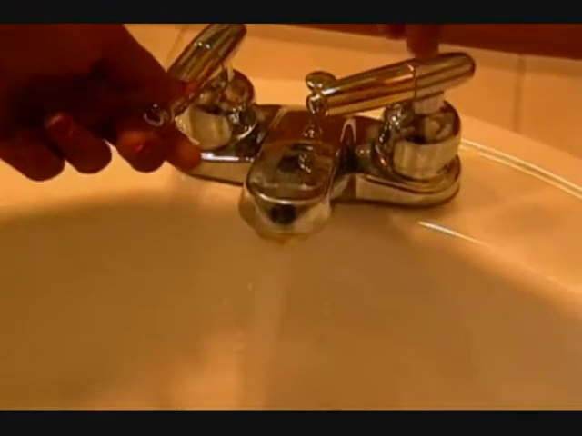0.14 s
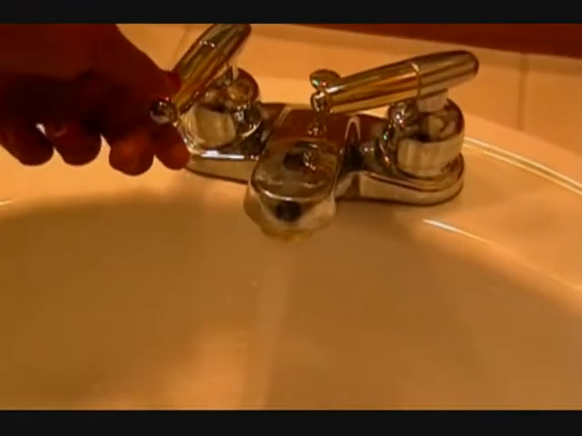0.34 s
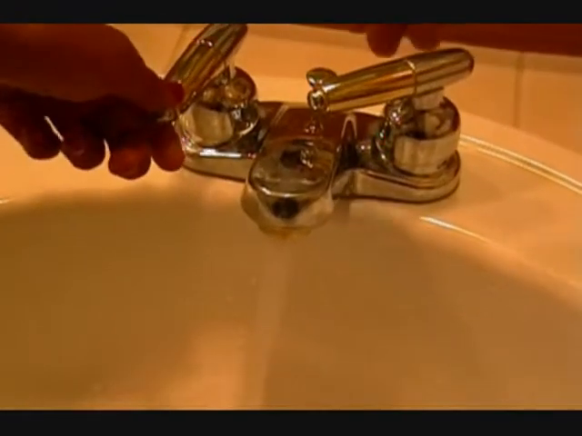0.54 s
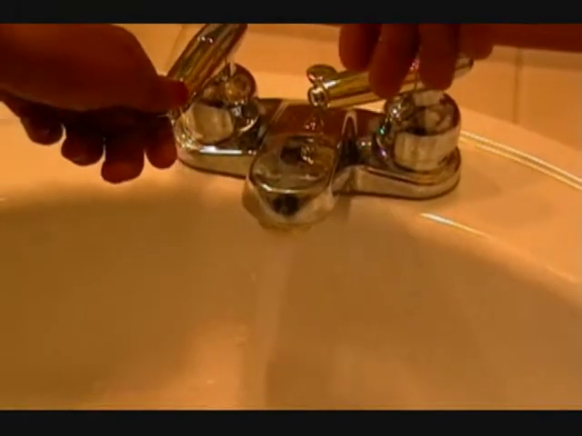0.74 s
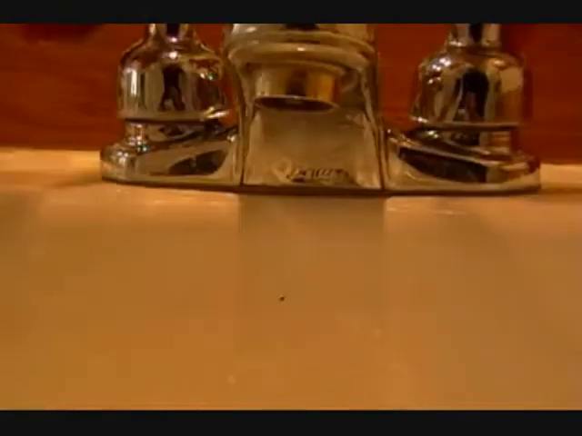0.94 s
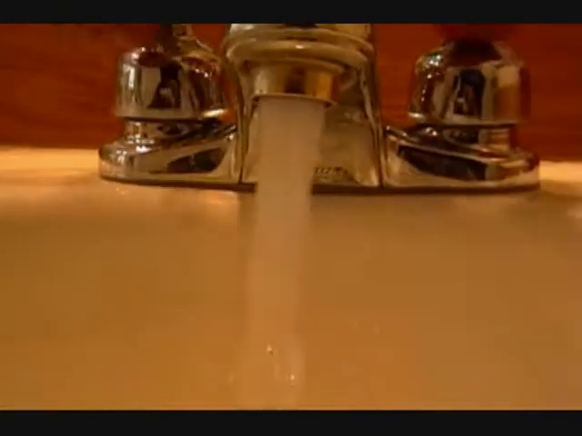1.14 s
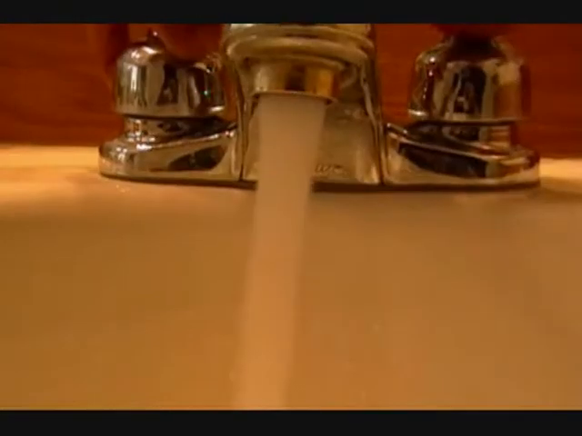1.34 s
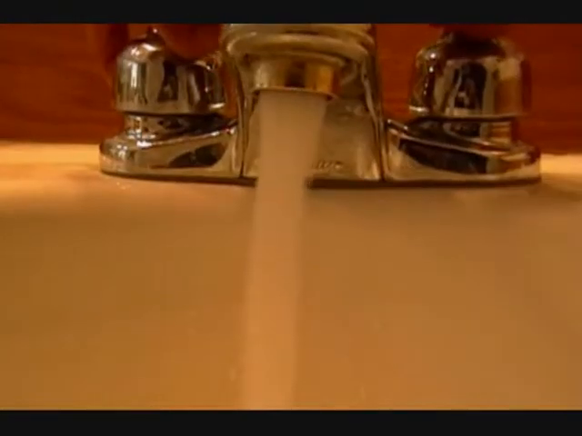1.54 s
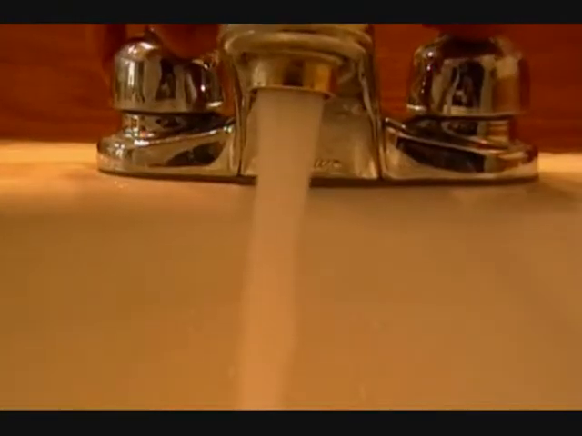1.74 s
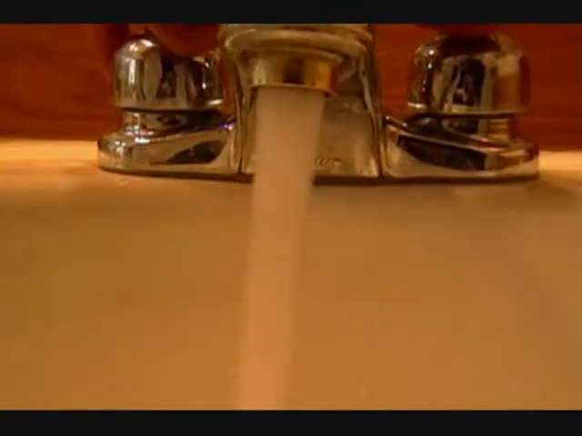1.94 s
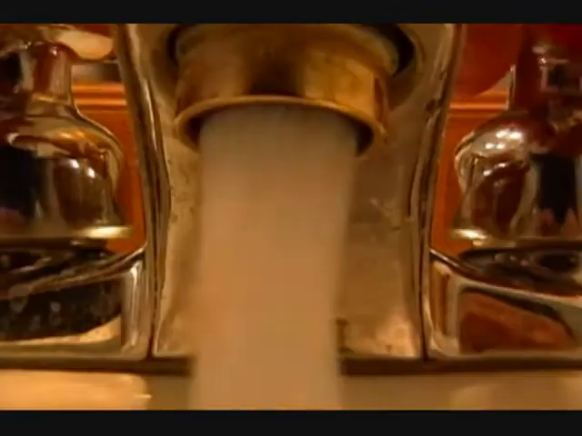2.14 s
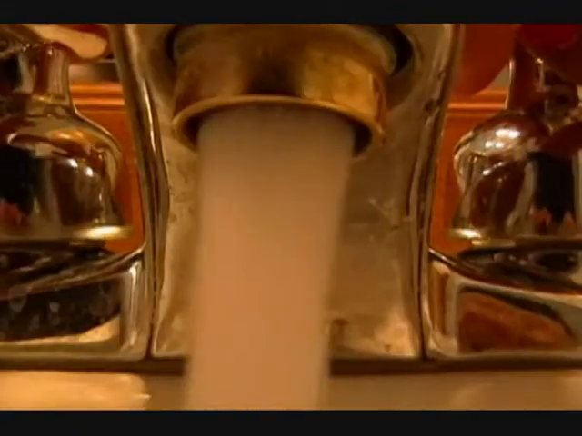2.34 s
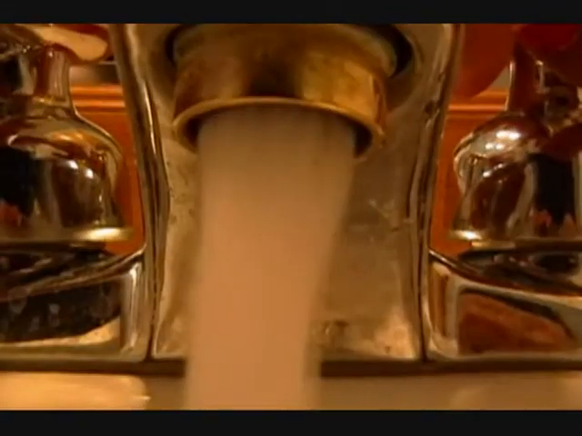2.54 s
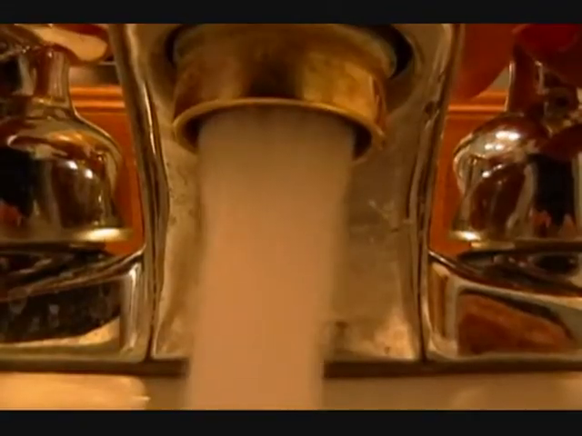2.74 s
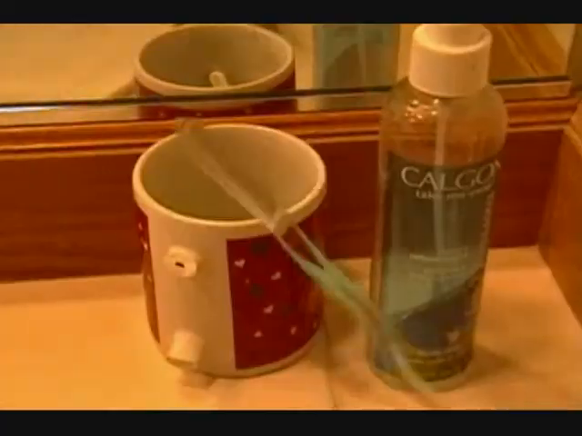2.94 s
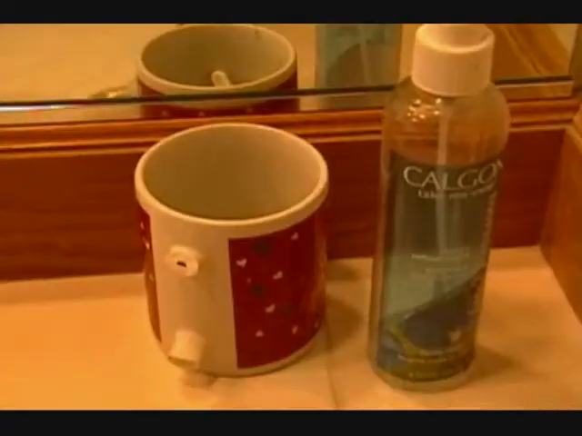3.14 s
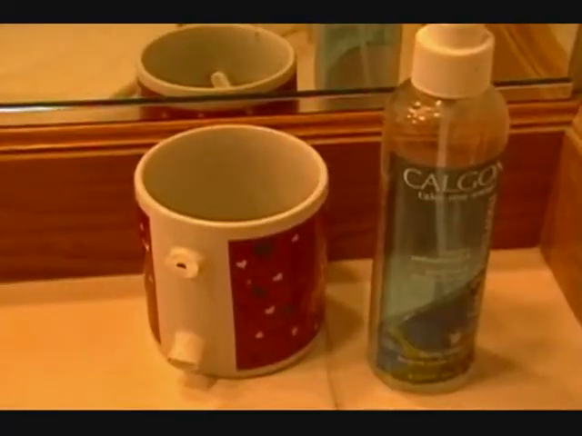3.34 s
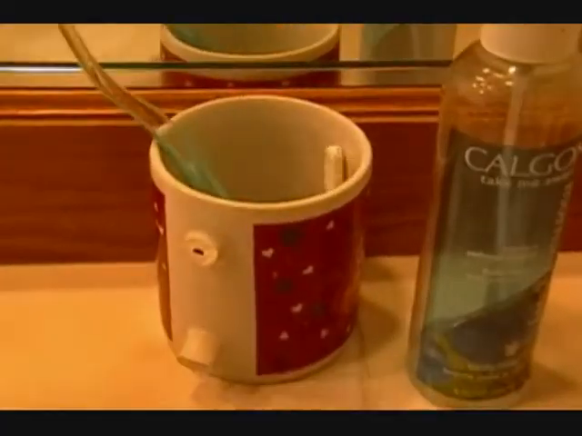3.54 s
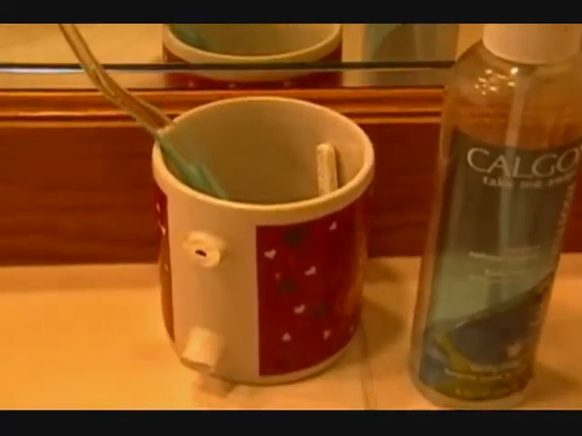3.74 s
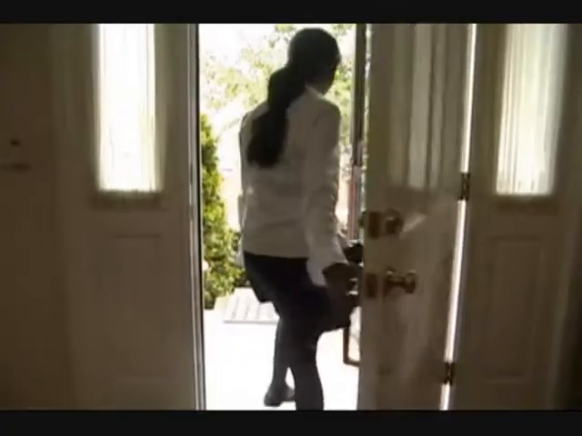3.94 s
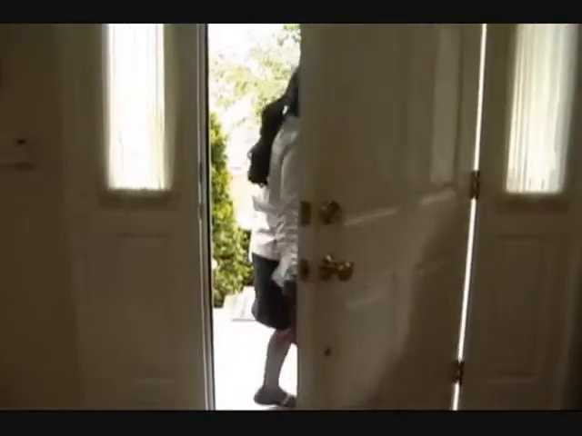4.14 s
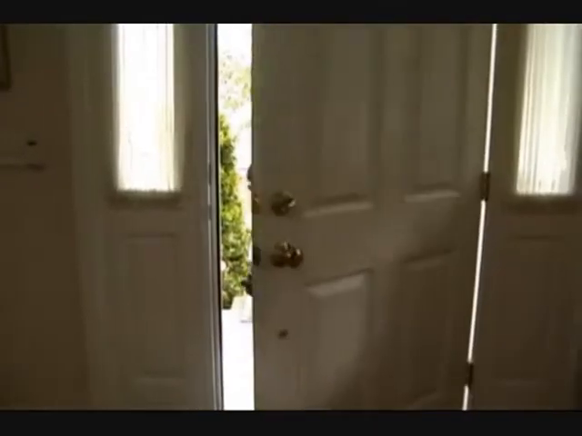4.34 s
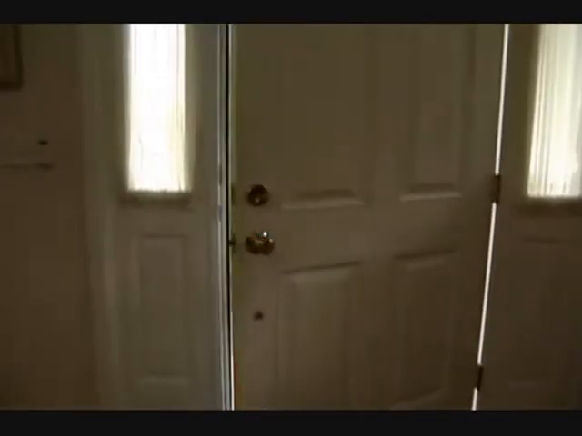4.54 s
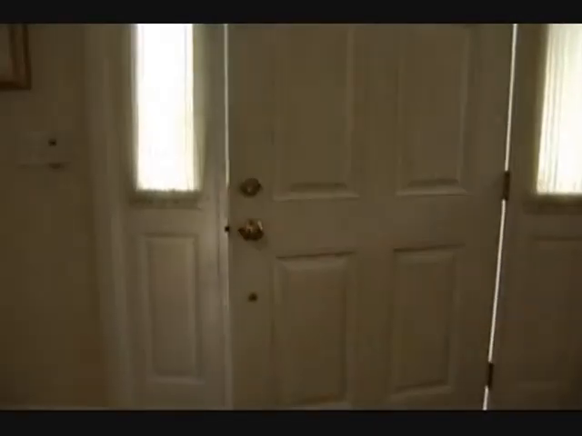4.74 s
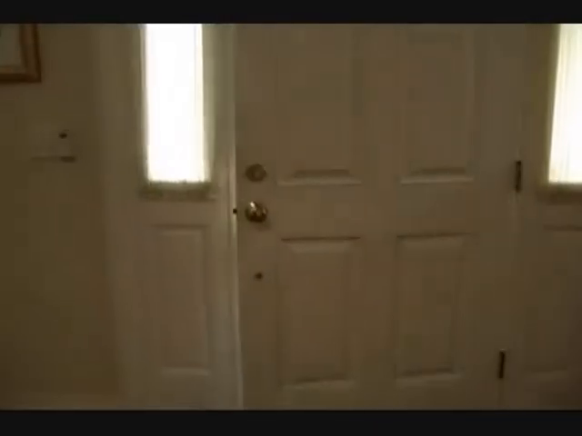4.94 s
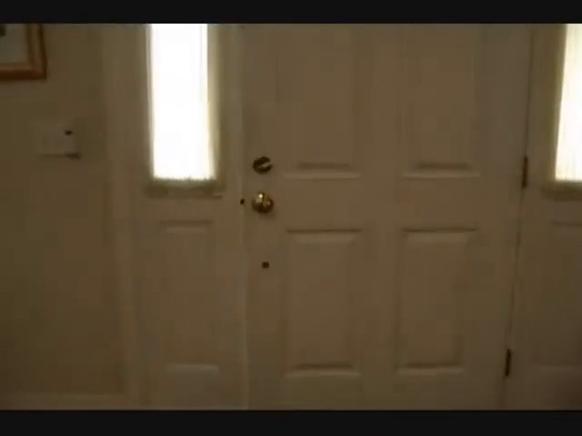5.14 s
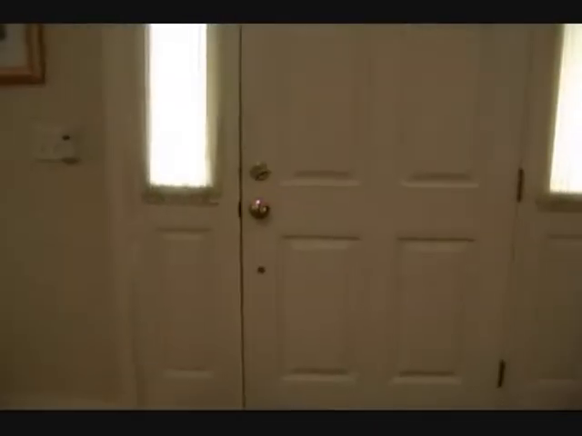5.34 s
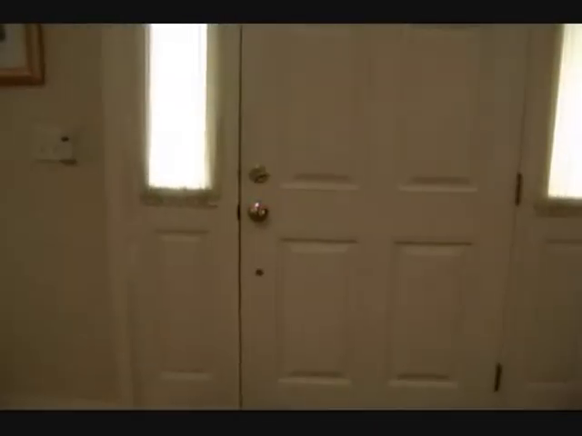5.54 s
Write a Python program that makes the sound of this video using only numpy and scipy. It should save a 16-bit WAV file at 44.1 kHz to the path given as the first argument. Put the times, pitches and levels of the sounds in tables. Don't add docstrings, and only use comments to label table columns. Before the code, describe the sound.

Bright, steady tap water drums faintly in a basin across three hard-cut shots, with a brief gap, creak and gurgle as the valve opens. Next come dry plastic clacks and a ringing mug. Finally, in a more echoing hall, faint footsteps and handle clicks lead to a door brushing its seal and slamming. Close, narrow, rough small-camera sound with limited treble.

```python
import sys
import numpy as np
from scipy import signal
from scipy.fft import rfft, irfft, next_fast_len
from scipy.io import wavfile
from scipy.ndimage import uniform_filter1d, map_coordinates

SR = 44100
rng = np.random.default_rng(int(sys.argv[2]) if len(sys.argv) > 2 else 0)


def unload_audio(sound):
    columns = np.transpose(np.atleast_2d(sound))
    steps = np.round(np.clip(columns, -1, 1) * 32767)
    wavfile.write(sys.argv[1], SR, steps.astype(np.int16))


def field_ratio(decibels):
    return 10 ** (np.asarray(decibels, dtype=float) / 20)


N = 250929
T = np.arange(N) / SR


def unit(x):
    return x / np.sqrt(np.mean(x ** 2) + 1e-20)


def along(points, hz):
    f, v = np.transpose(points)
    return np.interp(np.log(hz + 1), np.log(f + 1), v)


def gains(rows):
    s, *cols = np.transpose(rows)
    t = np.arange(s[0], s[-1], 1 / SR)
    return [field_ratio(np.interp(t, s, c)) for c in cols]


def wobble(rate_hz, size):
    knots = rng.standard_normal(int(N * rate_hz / SR) + 4)
    return map_coordinates(knots, [T[:size] * rate_hz])


def filtered(x, response):
    m = next_fast_len(x.shape[-1] + 8192)
    spectrum = rfft(x, m) * response(np.fft.rfftfreq(m, 1 / SR))
    return irfft(spectrum, m)[..., :x.shape[-1]]


def modes(peaks):
    def response(f):
        return sum((-1) ** k * field_ratio(db) * 1j * f * w / (c * c - f * f + 1j * f * w)
                   for k, (c, w, db) in enumerate(peaks))
    return response


def shape(points):
    return lambda f: field_ratio(along(points, f))


def tinted(response, hz, width_hz, lift):
    return lambda f: np.abs(response(f)) * (1 + lift * np.abs(modes([(hz, width_hz, 0)])(f)))


def rush(response, side_db, patchy_db, size):
    noise = rng.standard_normal((2, (size // 8192 + 2) * 8192))
    z = signal.stft(noise, nperseg=256)[2]
    field = uniform_filter1d(rng.standard_normal(z.shape[1:]), 4, 0)
    field = uniform_filter1d(field, 12, 1)
    pair = signal.istft(z * field_ratio(patchy_db * unit(field)), nperseg=256)[1]
    mid, side = filtered(pair, lambda hz: response(hz) * [hz * 0 + 1, field_ratio(along(side_db, hz))])
    side = side * field_ratio(1.2 * wobble(16, len(side)))
    return unit(np.array([mid + side, mid - side]))[:, 2048:][:, :size]


def burst(response, t60, room, wet_db, crack=0.39):
    hz, t, z = signal.stft(rng.standard_normal((2, SR * 2 // 5)), SR, nperseg=256)
    mid, side = signal.istft(z * field_ratio(-60 * t / along(room, hz)[:, None]), SR, nperseg=256)[1]
    side = filtered(side, lambda f: (f / (f + 400)) ** 2)
    tail = np.array([mid + 0.31 * side, mid - 0.96 * side]) / np.std(mid[:400])
    t = np.arange(len(mid)) / SR
    blow = rng.standard_normal(len(t)) * (field_ratio(-60 * t / t60) + crack * field_ratio(-60 * t / 0.003))
    cepstrum = irfft(np.log(np.abs(response(np.fft.rfftfreq(4096, 1 / SR))) + 1e-5))
    fold = np.r_[1, np.full(2047, 2), 1, np.zeros(2047)]
    colour = irfft(np.exp(rfft(cepstrum * fold)))
    sound = blow + field_ratio(wet_db) * tail * (1 - np.exp(-t / 0.0037))
    return signal.fftconvolve(sound, colour[None] / np.linalg.norm(colour), axes=1)


def add(track, s, sound):
    part = track[:, round(s * SR):][:, :sound.shape[-1]]
    part += sound[..., :part.shape[1]]


def chirps(rows):
    out = np.zeros((2, N))
    for s, length_s, start_hz, end_hz, db in rows:
        n = round(length_s * SR)
        pitch_hz = np.linspace(start_hz, end_hz, n) * (1 + 0.0071 * wobble(150, n))
        add(out, s, field_ratio(db) * np.hanning(n) * np.sin(2 * np.pi * np.cumsum(pitch_hz) / SR))
    return out


# start t/s, end t/s, aerator hiss level/dB, basin drumming level/dB, pool formed t/s
JET_RUNS = [
    (0, 1.032, -11, -30, -.2),
    (1.135, 1.173, -22, -32, 1.4),
    (1.173, 2.167, -10.5, -26, 1.31),
    (2.176, 2.87, -10, -27, 2.28),
]
# f/Hz, level/dB per Hz
JET_HISS = [
    [(290, -43.5), (500, -5), (586, -35), (639, -17), (865, -17.5), (957, -5), (1220, -12), (2000, -6),
     (2590, -6.5), (3400, -5), (4230, -4), (4540, -2), (7520, -2.5), (11900, -5), (15700, -13)],
    [(290, -26.5), (500, 5), (639, -11), (1450, -7), (1630, -1), (4950, -6.5), (9080, -9), (13600, -12.5),
     (15000, -22), (15700, -63)],
    [(290, -35), (500, -8.5), (707, -27), (943, -5), (1240, -14.5), (1590, -8), (2270, -3), (3310, -5),
     (3610, -5), (4950, -8), (5640, -1.5), (7000, -5), (9080, -4), (14400, -13), (15700, -21)],
    [(290, -36.5), (500, -6), (805, -35), (1140, -10), (1330, -9.5), (1830, -15), (2820, -3), (3030, -9.5),
     (3260, -3), (4950, -2), (5970, 1.5), (6420, -3.5), (7210, -1.5), (11400, -4.5), (15700, -10)],
]
# f/Hz, width/Hz, level/dB
SPOUT_MODES = [
    [(3413, 48, 3.5), (4600, 140, -11), (5750, 170, -1), (7453, 460, -3.5), (8570, 410, -9),
     (9040, 290, 0.5), (9970, 300, -6)],
    [(907, 21, 9), (3080, 120, -5), (3573, 79, -9), (6420, 86, -5.5), (7780, 290, -3), (9200, 110, 5.5),
     (11050, 230, -16.5)],
    [(3360, 60, -2.5), (4000, 120, -15), (6020, 140, -7.5), (7240, 130, -3), (8480, 240, -2.5),
     (9230, 310, -8.5), (9990, 360, -16)],
]
# f/Hz, width/Hz, level/dB
BOWL_MODES = [
    [(277.8, 137, -7), (377.5, 20.9, 2.5), (483.4, 20, -3.5)],
    [(273.16, 14.4, 6.5), (386.9, 21, -2.5), (492, 67, -13.5)],
    [(274.7, 20, 0), (363.3, 16, -2), (476.3, 49, -10.5)],
]
# f/Hz, width/Hz, level/dB
PIPE_MODES = [(99, 53, 0)]
# f/Hz, side over mid level/dB
WIDE_SIDE = [(60, -31), (950, -19), (3800, -12), (4800, -15), (5980, -11.5), (7800, -14.5), (10300, -9.5),
             (15000, -15)]
NARROW_SIDE = [(60, -29.5), (5980, -20), (10000, -12.5), (15000, -19.5)]


def jets():
    valve_s, open_s, open_db = 1.14, 0.12, -0.5
    pool_s, dry_bowl_db, slosh_db, slosh_hz = .06, -10.5, 1.5, 14
    pipe_db, hammer_db, hammer_t60_s = -53, -36, 1.2
    steady = .35
    shots = (0, 1, 1, 2)
    sides = (WIDE_SIDE, WIDE_SIDE, WIDE_SIDE, NARROW_SIDE)
    out = np.zeros((2, N))
    for run, spectrum, shot, side_db in zip(JET_RUNS, JET_HISS, shots, sides):
        start, end, hiss_db, drum_db, pooled_s = run
        t = np.arange(start, end, 1 / SR)
        n = len(t)
        running = t > valve_s
        opening = np.clip(1 - (t - JET_RUNS[2][0]) / open_s, 0, 1) * running
        colour = lambda f: shape(spectrum)(f) * (1 + .5 * np.abs(modes(SPOUT_MODES[shot])(f)))
        flutter = field_ratio(0.34 * wobble(10.494, n) + 0.37 * wobble(59.73, n) + 1.22 * wobble(500, n))
        hiss = unit(flutter * rush(colour, side_db, patchy_db=1.4527, size=n))
        add(out, start, field_ratio(hiss_db + open_db * opening) * hiss)

        dry_bowl = np.clip(.5 - (t - pooled_s) / pool_s, 0, 1)
        drum = field_ratio(drum_db + dry_bowl_db * dry_bowl + slosh_db * wobble(slosh_hz, n))
        bowl = rush(modes(BOWL_MODES[shot]), side_db, patchy_db=1.5, size=n)
        power = uniform_filter1d(bowl[0] ** 2, size=1500)
        add(out, start, drum * unit(bowl / np.abs(power + .05) ** (steady / 2)))

        hammer = field_ratio(hammer_db - 60 * np.abs(t - valve_s) / hammer_t60_s) * running
        shudder = field_ratio(pipe_db) + hammer
        add(out, start, shudder * rush(modes(PIPE_MODES), side_db, patchy_db=-0.5, size=n))
    return out


# f/Hz, t60/s
BATHROOM_T60 = [(200, 0.66), (2000, 0.258), (12000, 0.19)]


def smears():
    out = np.zeros((2, N))
    for s, db, t60 in ((1.032, -23.5, 0.0614), (2.167, -20, 0.05), (2.868, -17.5, 0.062)):
        add(out, s, field_ratio(db) * burst(shape(JET_HISS[0]), t60, BATHROOM_T60, wet_db=-37.5, crack=0))
    return out


# f/Hz, width/Hz, level/dB
VALVE_MODES = [(382, 150, 7), (150, 80, -6), (1200, 300, -14)]


def valve():
    out = np.zeros((2, N))
    add(out, 1.081, field_ratio(-30.5) * burst(modes(VALVE_MODES), 0.088, BATHROOM_T60, wet_db=-11.0))
    return out


# t/s, level/dB, t60/s
AIR_SPURTS = [
    (1.136, -18, .035),
    (1.1762, -10.5, 0.01),
]
# f/Hz, level/dB per Hz
SPURT_SPECTRUM = [(3000, -34.5), (5600, -12), (6500, -15), (8000, 1), (13000, -5.5), (15500, -22.5)]


def spurts():
    out = np.zeros((2, N))
    for s, db, t60 in AIR_SPURTS:
        add(out, s, field_ratio(db) * burst(shape(SPURT_SPECTRUM), t60, BATHROOM_T60, wet_db=-22.5))
    return out


# f/Hz, left over right level/dB
TAP_LEAN = [(60, 0), (240, 1), (950, 2.5), (3770, -0.7), (15000, -2.21)]


def tap():
    water = jets() + smears() + valve() + spurts()
    return filtered(water, lambda f: field_ratio([along(TAP_LEAN, f) / 2, -along(TAP_LEAN, f) / 2]))


# f/Hz, level/dB rms
HIGH_TONES = [(14088, -83), (14384, -83), (14686, -79), (14987, -81), (15283, -79), (15585, -83),
              (15730, -86)]


def tones_and_ticks():
    tones = sum(field_ratio(db + 1 + 4 * wobble(25, N)) * np.sin(2 * np.pi * hz * T) for hz, db in HIGH_TONES)
    ticks = np.maximum(np.cos(2 * np.pi * 29.97 * (T - 4.642)), 0) ** 12
    ticks = ticks * field_ratio(2.5 * wobble(20, N)) * np.sin(2 * np.pi * 5800 * T)
    return tones + field_ratio(np.interp(T, [4.3, 4.6], [-72, -61])) * ticks * (T > 3.7)


# t/s, level/dB
JOLT_EVENTS = [(0, -27), (1.15, -32), (2.1655, -20), (3.009, -25), (3.118, -29), (3.211, -23), (3.3, -31),
               (3.501, -36), (5.25, -26), (5.33, -14), (5.36, -20)]


def jolts():
    rise_s = .0035
    out = np.zeros((2, N))
    u = np.arange(SR // 10) / SR / rise_s
    for s, db in JOLT_EVENTS:
        add(out, s, field_ratio(db) * u * np.exp(1 - u) * field_ratio([[-1.0], [1.0]]))
    return out


# start t/s, end t/s, rumble level/dB, rustle level/dB, hiss level/dB
ROOM_TONES = [
    (1.034, 1.139, -46, -49.5, -49),
    (2.871, 3.901, -51.5, -52, -50),
    (3.901, 4.502, -55.5, -48, -56.5),
    (4.5, 5.694, -54.5, -57, -61),
]
# t/s, swell/s, fade/s for 60 dB, level/dB, brightness/dB
AIR_STIRS = [
    (2.94, 1, 0.68, -31, -25.5),
    (3.06, .3, 0.36, -45, 6.5),
    (3.22, 0.3, 1.5, -33, -19.5),
    (3.4, .4, 0.8, -37.5, -11.5),
    (3.5, 0.54, 0.3647, -31, -11),
    (3.59, 0.315, 0.02, -38, -10.5),
    (3.96, 0.72, 1.45, -49, -11.5),
    (4.39, 0.83, 1.17, -41, -9.5),
    (5.31, .2, 0.8044, -25.5, -24.5),
    (5.41, 0.76, 0.5468, -29.5, -8.5),
]
# f/Hz, level/dB per Hz
RUMBLE_SPECTRUM = [(15, -66.5), (25, -34), (80, 1.5), (124, 1.5), (145, -11), (188, 3.5), (264, -6),
                   (500, -21.5), (650, -60.5), (1100, -120)]
RUSTLE_SPECTRUM = [(210, -35), (350, -5.5), (486, -9), (667, -6.5), (809, -4.5), (1170, -11.5), (1370, -11),
                   (2250, -22), (2650, -34), (3500, -25.5), (4550, -55), (7700, -120)]
FAINT_HISS_SPECTRUM = [(1290, -27), (2200, 3.5), (4920, -3.5), (5850, -2), (6570, -4.5), (9740, -7.5),
                       (12900, -10), (13800, -13), (14300, -21), (15700, -25)]
# f/Hz, side over mid level/dB
ROOM_SIDE = [(60, -14.5), (240, -14), (950, -11), (3770, -6.5), (15000, 0.5)]


def air():
    stir = np.array([field_ratio(db - 60 * np.maximum((s - T) / swell, (T - s) / fade))
                     for s, swell, fade, db, _ in AIR_STIRS])
    rumble_share = np.full(len(AIR_STIRS), field_ratio(-14))
    rustle_share = np.ones(len(AIR_STIRS))
    hiss_share = field_ratio([row[-1] for row in AIR_STIRS])
    shares = [rumble_share, rustle_share, hiss_share]
    spectra = (RUMBLE_SPECTRUM, RUSTLE_SPECTRUM, FAINT_HISS_SPECTRUM)
    out = np.zeros((2, N))
    for start, end, *levels_db in ROOM_TONES:
        a, b = round(start * SR), min(round(end * SR), N)
        for db, share, spectrum in zip(levels_db, shares, spectra):
            gain = np.sqrt(field_ratio(2 * db) + share ** 2 @ stir[:, a:b] ** 2)
            add(out, start, gain * rush(shape(spectrum), ROOM_SIDE, patchy_db=.5, size=b - a))
    return out


# t/s, length/s, start f/Hz, end f/Hz, level/dB
GURGLE_EVENTS = [
    (1.155, .075, 1110, 1180, -22),
    (1.247, .018, 2700, 3600, -14),
    (1.27, .018, 2000, 2250, -15),
]


def gurgles():
    return chirps(GURGLE_EVENTS)


# t/s, knock level/dB, snap level/dB, knock colour f/Hz, snap colour f/Hz
BRUSH_CONTACTS = [(2.869, -21, -14, 2190, 3800), (2.908, -12, -28.5, 790, 3262),
                  (2.924, -13, -37, 474, 4106), (2.935, -16.5, -38, 835, 3337),
                  (3.009, -8, -0.5, 1060, 4470), (3.118, -5, -6, 434, 2395), (3.211, -2, 4.5, 1880, 5830),
                  (3.225, -12.5, -13, 1560, 5340), (3.262, -15, -8.5, 1050, 3755),
                  (3.302, -16, -8, 1698, 5770), (3.336, -8.5, -8.5, 1770, 3330),
                  (3.3565, -5, -8, 1850, 3220), (3.389, -15, -30, 1790, 3200),
                  (3.429, -21, -42, 1763, 3480), (3.501, -15.5, -21, 1340, 3900),
                  (3.563, -18, -22, 820, 3200), (3.583, -12, -44, 1230, 3880)]
# f/Hz, width/Hz, level/dB
HANDLE_MODES = [(413, 250, -5), (900, 623, -5), (1390, 770, -4.5)]
# f/Hz, level/dB per Hz
SNAP_SPECTRUM = [(880, -42), (1500, -7), (1860, -2.5), (2270, 1), (4780, -4.5), (5220, -8), (5710, -3.5),
                 (6230, -7), (15700, -16.5)]


def brush():
    out = np.zeros((2, N))
    for s, knock_db, snap_db, knock_hz, snap_hz in BRUSH_CONTACTS:
        knock = tinted(modes(HANDLE_MODES), knock_hz, 250, lift=3.5)
        snap = tinted(shape(SNAP_SPECTRUM), snap_hz, 600, lift=1.9)
        add(out, s, field_ratio(knock_db - 2.0) * burst(knock, 0.044, BATHROOM_T60, wet_db=-18))
        add(out, s, field_ratio(snap_db - 0.5) * burst(snap, 0.036, BATHROOM_T60, wet_db=-18.5))
    return out


# t/s, then push on each part of the lowest mode, signed share of full scale
MUG_BLOWS = [
    (2.8693, -.44, -.9, .76, -.36),
    (2.879, .32, -.31, .18, -.3),
    (2.908, -.05, .23, -.19, -.13),
    (3.0088, -.36, .45, -.14, .21),
    (3.118, .04, .07, .18, -.14),
    (3.501, -.01, -.47, .08, .06),
    (3.5612, .69, -.24, .04, -.07),
]
BLOW_UPPER_DB = [-21, -40, -33, -27, -28, -41, -29]
# f/Hz, t60/s
LOWEST_MODES = [(2681.05, .132), (2708.83, .279), (2721.18, .192), (2738.35, .169)]
# f/Hz, level/dB, t60/s
UPPER_MODES = [(7040, 0, .18), (7078, -3, .15), (9778, -5, .13), (9848, -12, .1), (11304, -8, .12),
               (11440, -15, .1), (12792, -11, .12)]


def mug():
    out = np.zeros((2, N))
    t = np.arange(SR // 2) / SR

    def ring(hz, t60):
        return field_ratio(-60 * t / t60) * np.sin(2 * np.pi * hz * t)

    for (s, *pushes), upper_db in zip(MUG_BLOWS, BLOW_UPPER_DB):
        low = sum(push * ring(*mode) for push, mode in zip(pushes, LOWEST_MODES))
        upper = sum(field_ratio(db + rng.normal(0, 1.5)) * ring(hz, t60) for hz, db, t60 in UPPER_MODES)
        add(out, s, (low + field_ratio(upper_db) * upper) * field_ratio([[-.4], [.4]]))
    return out


# t/s, thud level/dB, knock level/dB, click level/dB, click colour f/Hz
HALL_BLOWS = [(3.907, -52.5, -41.5, -55.5, 3770), (3.994, -56.5, -26, -36, 4200),
              (4.046, -51.5, -49.5, -52.5, 2200), (4.2, -45.5, -29, -41, 2530),
              (4.223, -46, -50, -38, 3510), (4.285, -55, -38, -55, 2000), (4.308, -47, -46.5, -53, 2520),
              (4.335, -63.5, -28.5, -37.5, 2356), (4.381, -49, -22.5, -26, 4600),
              (4.418, -55, -33, -40, 3200), (4.462, -55, -35, -40, 2600), (4.649, -50.5, -39, -52, 2551),
              (4.909, -59.5, -56, -61.5, 2240), (5.119, -61, -40, -56.5, 4480),
              (5.199, -54.5, -19, -35, 2570), (5.212, -46, -23.5, -30, 2730), (5.243, -50, -18, -30, 2000),
              (5.249, -29.5, -14, -8, 3300), (5.261, -21, -10.5, -25, 3170), (5.288, -26, -12, -18, 2300),
              (5.304, -28, -12, -18, 2400), (5.32, -17, -9, -16, 2197), (5.332, -19.5, -7, -10, 4500),
              (5.344, -26.5, -14.5, -29, 2296), (5.368, -20, -17, -22, 2480), (5.381, -19, -18, -20, 3100)]
# f/Hz, width/Hz, level/dB
LEAF_MODES = [(75, 22, -4), (195, 46, -1.5), (239, 40, 1)]
# f/Hz, level/dB per Hz
WOOD_SPECTRUM = [(210, -42), (350, -17.5), (471, -1.5), (751, 5.5), (1210, 4.5), (1690, 8), (2060, -5),
                 (3000, -13.5), (3900, -23.5), (6600, -120)]
METAL_SPECTRUM = [(1180, -29.5), (2000, -5.5), (2240, -8), (2900, -7.5), (3160, -11.5), (3850, -12),
                  (9040, -17), (15700, -28)]
# f/Hz, t60/s
HALL_T60 = [(100, 0.77), (2000, 0.54), (12000, 0.349)]


def hall():
    out = np.zeros((2, N))
    for s, thud_db, knock_db, click_db, click_hz in HALL_BLOWS:
        click = tinted(shape(METAL_SPECTRUM), click_hz, 350, lift=1.8)
        add(out, s, field_ratio(thud_db + 3.0) * burst(modes(LEAF_MODES), .04, HALL_T60, wet_db=-16.0, crack=1.5))
        add(out, s, field_ratio(knock_db - 6.0) * burst(shape(WOOD_SPECTRUM), 0.06, HALL_T60, wet_db=-10.5, crack=1.3))
        add(out, s, field_ratio(click_db - 0.5) * burst(click, 0.04, HALL_T60, wet_db=-12.5, crack=1.6))
    return out * field_ratio([[-.6], [.6]])


# t/s, level/dB
SEAL_SCRAPE = [(5.04, -64), (5.12, -47), (5.17, -44), (5.195, -37), (5.23, -33), (5.25, -21)]


def swing():
    out = np.zeros((2, N))
    gain, = gains(SEAL_SCRAPE)
    n = len(gain)
    colour = lambda f: shape(RUSTLE_SPECTRUM)(f) / (1 + (600 / (f + 1)) ** 4)
    scrape = field_ratio(3.0 * wobble(120, n)) * rush(colour, ROOM_SIDE, patchy_db=1.0, size=n)
    add(out, SEAL_SCRAPE[0][0], gain * scrape)
    return out


# t/s, length/s, start f/Hz, end f/Hz, level/dB
LATCH_SQUEAK = [
    (5.296, .028, 3450, 3000, -20),
]


def squeak():
    return chirps(LATCH_SQUEAK)


def scene():
    bathroom = tap() + tones_and_ticks() + jolts() + air() + gurgles() + brush() + mug()
    return bathroom + hall() + swing() + squeak()


def starved(x):
    floor_db, tilt_db_per_khz, from_hz = -84, 2.65, 3000
    busy_db, side_kept_db = -42.5, -11
    mid_side = np.array([x[0] + x[1], x[0] - x[1]]) / 2
    hz, _, z = signal.stft(mid_side, SR, nperseg=512)
    power = uniform_filter1d(np.abs(z) ** 2, size=3, axis=1)
    mid, side = uniform_filter1d(power, size=11, axis=2)
    limit = mid[hz > 1000].sum(0) * field_ratio(2 * (floor_db + tilt_db_per_khz * hz / 1000))[:, None]
    kept = (mid > limit) | (hz < from_hz)[:, None]
    busy = uniform_filter1d(np.median(mid, axis=0), size=15) > field_ratio(2 * busy_db)
    wide = (side > mid * field_ratio(2 * side_kept_db)) | ~busy
    mid, side = signal.istft(z * [kept, kept & wide], SR, nperseg=512)[1][:, :N]
    return np.array([mid + side, mid - side])


def gapped(f):
    width_hz = 45
    edges_hz = np.r_[np.arange(600, 5400, 300), np.arange(5400, 15700, 600)]
    gaps = np.prod([(e * e - f * f + .25j * f * width_hz) / (e * e - f * f + 1j * f * width_hz)
                    for e in edges_hz], axis=0)
    return gaps * np.clip((15860 - f) / 150, 0, 1) ** 2


def band_limit(x):
    return signal.sosfilt(signal.butter(12, 16150, fs=SR, output="sos"), x)


def record(dry):
    x = filtered(dry, lambda f: (1j * f / (50 + 1j * f)) ** 2)
    x = x / (1 + np.abs(x / 0.99) ** 8) ** (1 / 8)
    x = np.clip(filtered(starved(x), gapped), -1, 1)
    return band_limit(x)


dry = scene()
out = record(dry)
unload_audio(out)
```